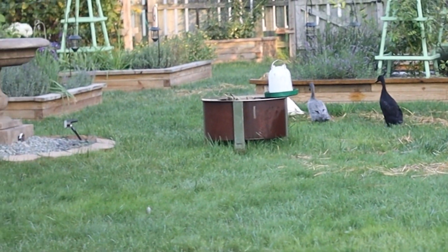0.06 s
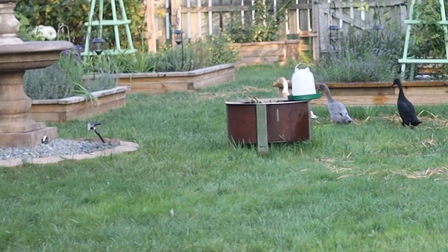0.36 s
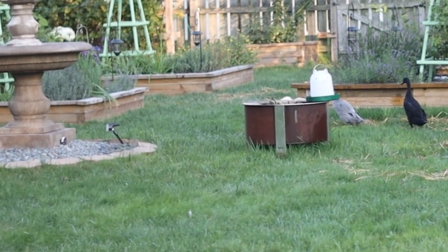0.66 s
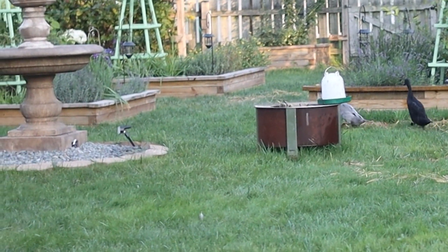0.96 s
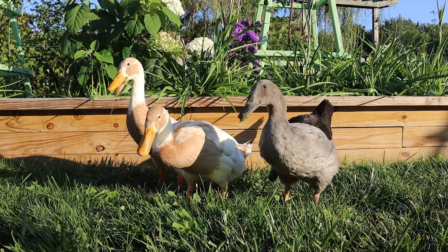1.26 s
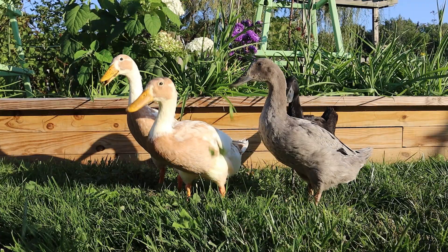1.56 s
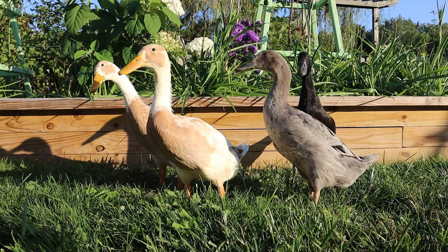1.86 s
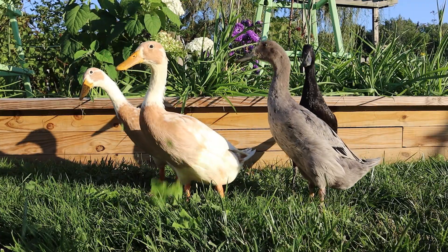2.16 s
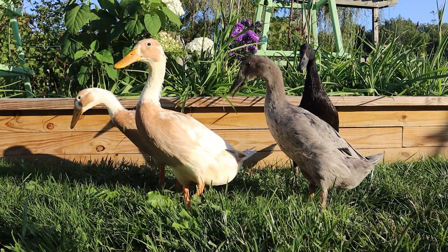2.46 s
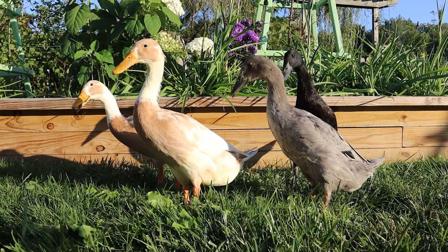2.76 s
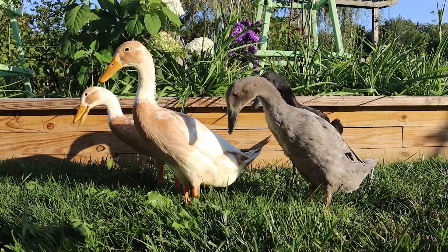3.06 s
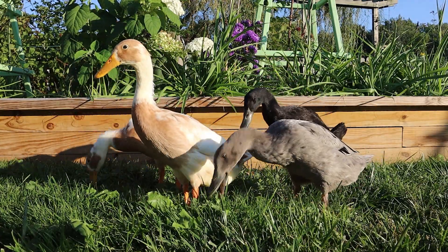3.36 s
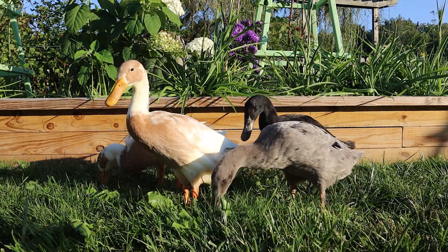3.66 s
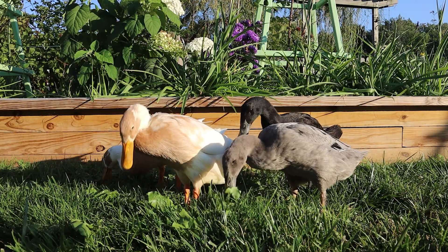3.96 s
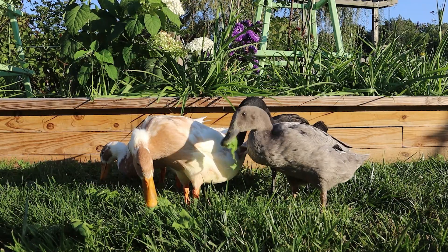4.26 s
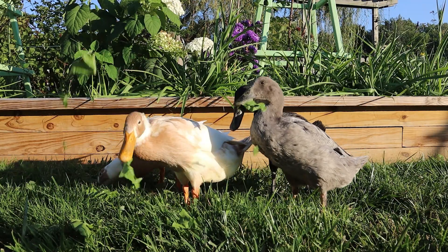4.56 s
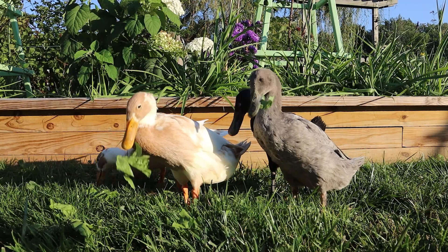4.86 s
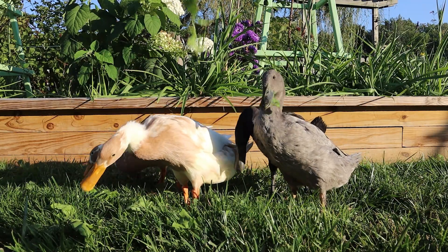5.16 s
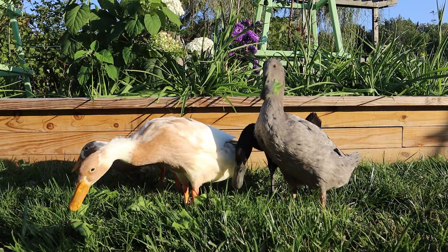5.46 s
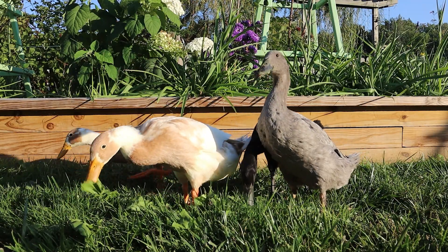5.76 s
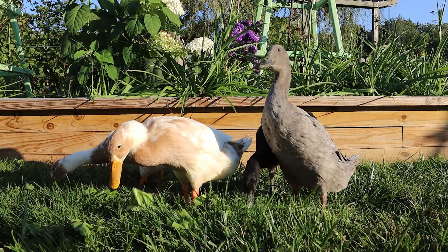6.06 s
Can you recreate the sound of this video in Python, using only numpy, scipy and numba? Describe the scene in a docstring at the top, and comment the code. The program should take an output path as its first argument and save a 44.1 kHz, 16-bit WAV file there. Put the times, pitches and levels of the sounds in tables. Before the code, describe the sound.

After a brief distant traffic rumble, nearby ducks tear grass, clap their bills and mutter with soft quacks and small falling squeaks.

```python
"""A garden lawn. Town noise and a faint insect fill the first 1.2 s; then the wash drops and ducks forage close.
Syrinx pulses ring chest, throat and bill: swelling grunts, some with a whistle, one full croak,
and short mutters that break into falling squeaks. Bills clap shut and tear grass until it snaps.
A distant motor gathers speed; boards and fence return a short echo."""
import sys
import numpy as np
from scipy import signal
from scipy.fft import rfft, irfft
from scipy.io import wavfile
from scipy.ndimage import uniform_filter1d
from numba import njit

SR = 44100
rng = np.random.default_rng(int(sys.argv[2]) if len(sys.argv) > 2 else 0)


def unload_audio(sound):
    """Save the sound as a 16-bit wav file, at the path given as the first command line argument."""
    columns = np.transpose(np.atleast_2d(sound))
    # keep every value between -1 and 1, then stretch to whole-number steps
    steps = np.round(np.clip(columns, -1, 1) * 32767)
    wavfile.write(sys.argv[1], SR, steps.astype(np.int16))


N = 269892
T = np.arange(N) / SR

# Town noise spectra, far and near. Each row: frequency in Hz, level in dB.
FAR_TOWN_SPECTRUM = [(15, -40.5), (25, -11.5), (50, -8), (98, -0.5), (154, -9.5), (191, -6.5), (326, -19.5),
                     (415, -23), (543, -25.5), (709, -18.5), (1030, -15.5), (2240, -27), (3630, -48),
                     (8780, -65), (11800, -75), (15000, -103)]
NEAR_TOWN_SPECTRUM = [(15, -66), (25, -32.5), (60, -13.5), (130, -8), (200, -17.5), (300, -19.5),
                      (450, -28.5), (1200, -26), (2000, -31.5), (3000, -44), (5000, -52), (7000, -55.5),
                      (10000, -65), (15000, -76.5)]
# Width of diffuse sound. Each row: frequency in Hz, side minus mid in dB.
DIFFUSE_WIDTH = [(60, -32.5), (110, -29), (200, -17), (380, -11.5), (700, -9), (1290, -5.5), (2380, -1),
                 (4400, 3), (8120, 5.5), (15000, 1.5)]
# Engine run-up. Each row: time in seconds, cycle rate in Hz, level in dB.
MOTOR_RUN_UP = [(1.199, 13, -71.5), (2.999, 15.3, -66), (3.999, 18, -49.5), (4.999, 20.2, -51),
                (5.6, 20.5, -43), (6.12, 25.3, -39.5)]
# Engine orders. Each row: multiple of the cycle rate, relative level in dB.
MOTOR_HARMONICS = [(4, -21), (6, -8.5), (7, -1), (8, 1), (10, -1), (11, -5.5), (12, -7), (16, -16.5)]
# Stereo image, for voices and for grazing. Each row: frequency in Hz, left phase lead in radians, left minus
# right in dB.
VOICE_STEREO = [(100, 0.1, -2), (400, 0.17, -0.1), (1200, 0.49, -1.5), (2200, 0.64, -2), (4200, 1, -1.5),
                (5950, -2, -4), (8000, -0.5, -5), (15000, -2.5, -1)]
GRAZING_STEREO = [(100, 0.3, 0), (400, 0.27, 0.2), (1216, 0.2, 0.3), (2190, 0.87, -0.4),
                  (4600, 1.17, -0.49), (6140, 0.9, -0.39), (8030, 2.39, -1.1), (15000, 2.35, 0.3)]

# Grass rustling, tearing and snapping. Each row: frequency in Hz, gain in dB.
RUSTLE_SPECTRUM = [(600, -27), (2000, -3), (3600, 6.5), (5000, -3.5), (7000, -20.5), (14000, -33)]
TEAR_SPECTRUM = [(130, -8.5), (260, -5), (380, -1), (600, 13), (950, -15), (1500, 1), (3000, -1.5),
                 (5200, -4), (8000, -7.5), (11000, -18), (16000, -36)]
SNAP_SPECTRUM = [(150, -12), (650, -0.5), (1000, -23.5), (2000, 0.5), (3200, 1), (4100, -3.5), (4900, 5.5),
                 (6200, -15), (8000, -6.5), (10500, -25.5), (16000, -29.5)]
# Nibbles. Each row: start in seconds, length in seconds, level in dB.
GRASS_NIBBLES = [(0.878, 0.066, -50), (2.667, 0.018, -52), (3.037, 0.018, -55.5), (3.423, .026, -33),
                 (3.746, .012, -54), (3.802, 0.014, -49), (4.644, .014, -49.5), (4.738, .014, -56),
                 (5.189, 0.011, -45)]
# Grass pulls. Each row: snap time and pull length in seconds, snap and tear levels in dB,
# hollow bill ring in dB, gain at 12 kHz in dB.
GRASS_PULLS = [(1.232, .035, -22.5, -39, -3, -2), (1.8855, .075, -24, -39.5, -15, -5),
               (2.7069, .055, -29, -47, 4, 1), (3.487, 0.14, -18.5, -36.5, -3.5, -1),
               (4.181, 0.043, -22.5, -41.5, -18, -4), (5.003, .095, -20, -36.5, -1.5, -6),
               (5.75, 0.098, -17.5, -34, -3.5, -2), (6.087, 0.00081, -37.5, -47.5, -11, -13)]
# Hollow bill. Each row: mode frequency in Hz, width in Hz, gain in dB.
BILL_MODES = [(309, 23, -8.5), (537, 45, -11.5), (757, 70, -8), (940, 100, -8), (1106, 62, -8.5),
              (1338, 52, 3.5), (1655, 63, -2.5), (1865, 46, -8.5), (2380, 99, -9.5), (2720, 130, -15),
              (3100, 140, -23)]
# Claps. Each row: start in seconds, level in dB, factor on the mode frequencies,
# choke time in seconds, left minus right in dB.
BILL_CLAPS = [(1.4439, -14, 1.018, 0.018, 4), (1.9313, -14, .99, 0.01, 5.5), (3.1484, -20, 1.1, .007, 3),
              (4.5197, -26, 1.11, 0.0038, -2), (4.5956, -34, 1.1, 0.0052, -1),
              (4.898, -28, 1.03, 0.005, -1.5), (5.0869, -23.5, 1, 0.0038, -4)]

# Chest response. Each row: multiple of the chest resonance, gain in dB.
CHEST_RESPONSE = [(.21, -29), (.42, -7), (.67, 0), (1, 9.5), (1.3, -2), (1.6, -0.5), (2.7, -65)]
# Throat and upper bill resonances. Each row: frequency in Hz, width in Hz, gain in dB.
THROAT_MODES = [(582, 70, 6.5), (816, 110, -4)]
RASP_MODES = [(2400, 300, 2), (3610, 290, 2), (4430, 350, 0.5), (5730, 470, -0.5)]
# Bill rasp, windpipe and wide-open throat. Each row: frequency in Hz, gain in dB.
RASP_SPECTRUM = [(1500, -18), (2500, -1), (3600, 0), (4700, 0), (5400, -5), (6300, -10), (7200, -17),
                 (15000, -32)]
WINDPIPE_SPECTRUM = [(100, 0), (390, 0), (490, 0.5), (590, -1), (700, -2), (950, 3), (1280, 2.5),
                     (1500, -1.5), (2200, 1.5), (3100, -2), (3600, -1.5), (4250, -4), (4800, -9),
                     (5600, -5), (7000, -9.5), (15000, -23)]
CROAK_SPECTRUM = [(100, -24.5), (250, 2), (380, -3.5), (520, -6.5), (740, -2.5), (950, -27), (1300, -15),
                  (1850, -16.5), (2300, -23), (2650, -21), (3300, -30.5), (5200, -35), (7000, -48),
                  (15000, -63)]
# Whistles on the build-up of grunts. Each row: top time and fall in seconds, top in Hz, level in dB.
GRUNT_WHISTLES = [(3.754, .028, 1850, -27.5), (3.951, 0.034, 1850, -33), (5.201, 0.025, 1927, -30.5)]
# Mutters. Each row: start, squeak top time and squeak fall in seconds, opening level in dB,
# bill ring over that in dB, squeak level in dB, squeak top in Hz, closing grunt length in seconds.
MUTTER_CALLS = [(2.215, 2.253, 0.021, -42.5, -5, -52.5, 1787, 0.0018),
                (2.527, 2.556, .017, -37, -9.5, -30.5, 1850, .035),
                (3.153, 3.183, 0.017, -26, -1.5, -27.5, 2020, .021),
                (3.638, 3.669, .016, -48.5, 0, -32.5, 1680, .009),
                (3.99, 4.029, .024, -55.5, -14, -50.5, 1860, 0.0032),
                (4.182, 4.213, 0.03, -31.5, -12.5, -44, 1950, 0.00065),
                (4.37, 4.412, 0.015, -40, -11, -47.5, 1880, 0.0012),
                (4.519, 4.553, .018, -32.5, 0.5, -26, 1980, .02),
                (5.019, 5.046, .023, -28, -2.5, -23.5, 1980, .019)]
# Swelling grunts. Each row: crest time, build-up and fade in seconds, crest pitch in Hz,
# crest half-width in seconds, chest, throat, bill and rasp levels in dB ahead of the windpipe,
# open-bill and chest resonances in Hz.
GRUNT_CALLS = [(1.8993, 0.037, .03, 146.2, 0.02, -34.5, -38.5, -33.5, -43, 1300, 315),
               (2.709, .018, .022, 204.8, .02, -32, -29, -33.5, -44, 1320, 362),
               (2.7384, 0.012, 0.019, 167.5, 0.019, -34.5, -36, -30, -45, 1530, 331),
               (3.0, .045, .03, 171, 0.018, -30.5, -37, -28, -42, 1437, 339),
               (3.294, 0.058, 0.04, 184.8, 0.015, -31, -38.5, -28, -42.5, 1530, 317),
               (3.483, 0.043, 0.019, 206.2, .0082, -28.5, -37, -24, -40, 1690, 336),
               (3.7826, .05, 0.034, 201.3, 0.011, -27.5, -32, -25.5, -37.5, 1750, 339),
               (3.9786, 0.052, 0.018, 202.7, 0.013, -28, -29.5, -24, -37, 1794, 328),
               (4.8705, .046, .03, 192.4, 0.011, -26.5, -31.5, -27.5, -36, 1574, 315),
               (5.2313, 0.052, 0.028, 203.9, 0.013, -26, -27.5, -27, -32, 1785, 313),
               (5.481, 0.0067, 0.025, 190, 0.01, -30, -29.5, -57, -52, 1150, 381),
               (5.531, 0.028, 0.036, 208.4, 0.021, -24.5, -23, -26, -25.5, 1690, 339)]

NEAR_FROM_S = 1.2
CLOSING_HZ = 194.2  # pulse rate at the end of a squeak and in the grunt after it


def undb(db):
    """Decibels to gain."""
    return 10 ** (np.asarray(db) / 20)


def level(x, db, seconds):
    """Scale x so that its energy, spread over the given time, has this rms level."""
    return x * undb(db) / np.sqrt(np.sum(x ** 2) / (seconds * SR) + 1e-18)


def on_bins(points, size):
    """Interpolate (Hz, value) points onto FFT bins."""
    hz, value = np.transpose(points)
    return np.interp(np.log(np.arange(size // 2 + 1) * SR / size + 1), np.log(hz + 1), value)


def colour(x, points, size=4096):
    """Minimum-phase filter with the given (Hz, dB) response."""
    cepstrum = irfft(np.log(undb(on_bins(points, size))))
    cepstrum[1:size // 2] *= 2
    cepstrum[size // 2 + 1:] = 0
    return signal.fftconvolve(x, irfft(np.exp(rfft(cepstrum))))[:len(x)]


def ring(x, hz, width_hz):
    """Fixed resonance, unity gain at centre."""
    return signal.lfilter(*signal.iirpeak(hz, hz / width_hz, fs=SR), x)


@njit
def sweep(x, hz, width_hz):
    """Moving resonance, unity gain at centre."""
    y, band, low = np.empty(len(x)), 0., 0.
    for i in range(len(x)):
        g, damping = np.tan(np.pi * hz[i] / SR), width_hz / hz[i]
        v = (band + g * (x[i] + 1e-18 - low)) / (1 + g * (g + damping))
        band, low, y[i] = 2 * v - band, low + 2 * g * v, damping * v
    return y


def walk(rate_hz):
    """Smooth random drift, spread near 1."""
    hold = int(SR / rate_hz)
    steps = np.repeat(rng.standard_normal(N // hold + 1), hold)
    return 1.3 * uniform_filter1d(uniform_filter1d(steps, hold), hold)[:N]


def window(start_s, size=8192):
    """Sample times of one short event, in seconds."""
    return (int(start_s * SR) + np.arange(size)) / SR


def add(out, x, start_s, pan_db=0):
    """Mix a short sound into both channels."""
    i = int(start_s * SR)
    out[:, i:i + len(x)] += undb(np.array([[pan_db], [-pan_db]]) / 2) * x[:N - i]


def stereo_image(x, table):
    """Near sound is given frequency-dependent phase and level differences between left and right."""
    hz, phase, pan_db = np.transpose(table)
    lead_rad, louder_db = (on_bins(np.transpose([hz, column]), N) for column in (phase, pan_db))
    half = np.array([[1], [-1]]) / 2
    return irfft(rfft(x) * np.exp(1j * half * lead_rad) * undb(half * louder_db), N)


def diffuse(spectrum):
    """Stereo noise from all round."""
    side_gain = undb(on_bins(DIFFUSE_WIDTH, N))
    mid, side = (rfft(rng.standard_normal(N)) * undb(on_bins(spectrum, N)) for _ in range(2))
    return irfft(mid + np.array([[1], [-1]]) * side * side_gain, N)


def town(far_db=-28, near_db=-52):
    """Town rumble and hiss: loud at first, then at 1.2 s the scene changes to a faint wash."""
    far, near = diffuse(FAR_TOWN_SPECTRUM), diffuse(NEAR_TOWN_SPECTRUM)
    far *= undb(far_db + .5 * walk(2.87)) / np.std(far.mean(0))
    rise_db = np.interp(T, [1.5, 3, 6], [-1.5, 1, 3])
    near *= undb(near_db + rise_db + 2 * walk(3.017)) / np.std(near.mean(0))
    far_gate = np.interp(T, [NEAR_FROM_S - .004, NEAR_FROM_S + .0047], [1, 0])
    return far * far_gate + near * (T > NEAR_FROM_S)


def insect(hz=8750, width_hz=220, db=-77, length_s=.055, period_s=.247, until_s=.9):
    """Far insect: thin, high chirps at an even pace."""
    gate = (T % period_s < length_s) & (T < until_s)
    song = ring(ring(rng.standard_normal(N), hz, width_hz), hz, width_hz)
    return level(song, db, N / SR) * uniform_filter1d(gate.astype(float), size=400)


def drone(base_db=-61, start_hz=350, end_hz=300):
    """A faint far hum sinks in pitch, swells and dies down."""
    phase = 2 * np.pi * np.cumsum(np.interp(T, [NEAR_FROM_S, 3], [start_hz, end_hz])) / SR
    hum = walk(100) * np.sin(phase) + walk(100) * np.cos(phase)
    return undb(base_db) * hum * np.interp(T, [NEAR_FROM_S, 1.5, 2.8, 4], [.26, .16, 2.66, .1])


def motor(flutter_db=3):
    """Far engine: low orders climb together, each fading in and out."""
    times_s, hz, db = np.transpose(MOTOR_RUN_UP)
    phase = 2 * np.pi * np.cumsum(np.interp(T, times_s, hz) * (1 + .021 * walk(40))) / SR
    hum = sum(undb(order_db + flutter_db * walk(9.3)) * np.sin(order * phase + 2 * np.pi * rng.random())
              for order, order_db in MOTOR_HARMONICS)
    return level(hum, 0, N / SR) * undb(np.interp(T, times_s, db)) * (T > NEAR_FROM_S)


def garden_echo(x, tail_db=-23, t60_s=.15, size=16384):
    """Boards and fence return a short, dull scatter."""
    t = T[:size]
    scatter = diffuse([(100, 0), (400, 5), (1400, -1), (4000, -10.5), (15000, -39)])[:, :size]
    tail = scatter * undb(-60 * t / t60_s) * (t > .003)
    tail *= undb(tail_db) / np.sqrt(np.sum(tail ** 2) / 2)
    return signal.fftconvolve(x.mean(0)[None] / 2, tail, axes=1)[:, :N]


def stirring(db=-70, patchy_db=4):
    """Feet keep the grass faintly stirring."""
    blades = colour(rng.standard_normal(N), RUSTLE_SPECTRUM) * undb(patchy_db * walk(56))
    return level(blades, db, N / SR) * np.interp(T, [NEAR_FROM_S, 2.5, 4], [.12, .16, 1])


def crackle(per_s=70, db=-77, spread_db=3, crumble_s=.00088):
    """Single blades tick underfoot, louder as grazing starts."""
    hits = rng.random(N) < per_s / SR
    strength = undb(spread_db * np.clip(rng.standard_normal(N), -2, 2))
    ticks = hits * strength * np.interp(T, [NEAR_FROM_S, 4], [0, 1])
    crumble = signal.lfilter([1], [1, -np.exp(-1 / (crumble_s * SR))], ticks) * rng.standard_normal(N)
    return level(colour(crumble, [(800, -13), (3500, .5), (8000, -9), (14000, -24)]), db, N / SR)


def nibble(length_s, db):
    """A bill brushes a few blades: a soft rustle swells and fades."""
    t = window(0)
    brush = rng.standard_normal(len(t)) * np.sin(np.pi * np.minimum(t / length_s, 1)) ** 2
    return level(colour(brush, RUSTLE_SPECTRUM), db, length_s / 2)


def tear(grip_s, snap_s, db, hollow_db, release_s=.0099):
    """Fibres part in a dense rip that grows with the pull, slackens and stops as the blade gives."""
    t = window(grip_s)
    strain = np.interp((t - grip_s) / (snap_s - grip_s), [0, .35, .72, 1], [0, .2, .83, .67])
    strain *= np.exp(-np.maximum(t - snap_s, 0) / release_s)
    fibres = rng.standard_normal(len(t)) * (rng.random(len(t)) < .18)
    fibres *= undb(4 * np.minimum(rng.exponential(size=len(t)), 3) + 3.6 * walk(400)[:len(t)])
    rip = colour(fibres * strain ** .77, TEAR_SPECTRUM)
    return level(colour(rip, [(380, 0), (600, hollow_db), (950, 0)]), db, snap_s - grip_s)


def snap(db, crumble_s=.0021):
    """The last fibres break at once: a sharp click, a brief crumble."""
    t = window(0)
    burst = .11 * rng.standard_normal(len(t)) * np.exp(-t / crumble_s)
    burst[0] += 1
    return level(colour(burst, SNAP_SPECTRUM), db, .0061)


def clap(db, mode_scale, choke_s, contact_s=.0013, tick_db=-22, choked_above_hz=600):
    """The bill presses shut, snaps home and its hollow rings."""
    t = window(0)
    blow = .02 * rng.standard_normal(len(t)) * np.minimum(t / contact_s, 1) * np.exp(-t / .004)
    blow[int(contact_s * SR / 2)] += 1
    choke = np.exp(-(t / choke_s) ** 3 / 2)  # the shut halves damp all but the lowest modes
    hollow = np.zeros(len(t))
    for k, (hz, width_hz, mode_db) in enumerate(BILL_MODES):
        # alternating signs make the knock swell briefly
        mode = (-1) ** k * undb(mode_db) * ring(blow, hz * mode_scale, width_hz)
        hollow += mode * (choke if hz > choked_above_hz else 1)
    tick = colour(rng.standard_normal(len(t)) * np.exp(-abs(t - contact_s) / .00061), SNAP_SPECTRUM)
    knock = level(hollow, db, .01) + level(tick, db + tick_db, .01)
    treble_db = np.interp(db, [-18, -16], [-30, 0])  # only hard claps are bright
    return colour(knock, [(2000, 0), (3000, treble_db / 2), (9000, treble_db)])


def grass_pull(snap_s, pull_s, snap_db, tear_db, hollow_db, crisp_db):
    """A bill tears grass until it snaps. Returns (sound, start) pairs."""
    grip_s = snap_s - pull_s
    crispness = [(6000, 0), (12000, crisp_db)]
    return [(colour(tear(grip_s, snap_s, tear_db, hollow_db), crispness), grip_s),
            (colour(snap(snap_db), crispness), snap_s)]


def squeak(top_s, fall_s, top_hz, db, rise_s=.019, floor_ratio=.44, onset_db=-42, breath_db=-16):
    """The syrinx slips into a breathy whistle that arches, dives and roughens. Returns sound, start."""
    t = window(0) - rise_s
    peak_s, end_s = .7 * fall_s, 1.47 * fall_s
    fall = np.clip(t / end_s, 0, 1)
    arch = np.exp(-(t / np.where(t < 0, .027, fall_s)) ** 2)
    hz = top_hz * (floor_ratio + (1 - floor_ratio) * arch)
    waver, flutter = walk(1100)[:len(t)], walk(800)[:len(t)]
    phase = 2 * np.pi * np.cumsum(hz * (1 + (.035 + .055 * fall) * waver)) / SR
    onset = min(undb(onset_db - db), 1)
    swell = np.interp(t, [-rise_s, 0, peak_s / 3, peak_s, end_s, end_s + .004],
                      [onset / 2, onset, max(onset, .25), 1, .45, 0])
    swell *= 1 + .4 * fall * flutter
    # returning pulses chop the end
    growl = 1 + .56 * fall ** 2 * np.cos(2 * np.pi * (CLOSING_HZ * t + rng.random()))
    breath = colour(rng.standard_normal(len(t)), [(500, -9), (1100, 6.5), (3200, -8.5), (8000, -44)])
    overtone_db = np.interp(db, [-45, -30], [-11, -22])  # louder is rounder
    tone = level(breath, breath_db, len(t) / SR) + np.sin(phase) + undb(overtone_db) * np.sin(2 * phase)
    return np.sqrt(2) * undb(db) * swell * growl * tone, top_s - rise_s


def croak(db=-16.5, hold_s=.059, release_s=.0091, edge_hz=140, top_hz=271, edge_db=-4):
    """Even syrinx pulses arch in pitch, strength and brightness through a wide-open throat."""
    t = window(0)
    arch = np.sin(np.pi * np.minimum(t / hold_s, 1))
    hz = (edge_hz + (top_hz - edge_hz) * arch) * (1 + .017 * walk(250)[:len(t)])
    pulses = np.diff(np.floor(np.cumsum(hz) / SR), prepend=-1)
    breath = .038 * colour(rng.standard_normal(len(t)), [(500, -2.5), (1500, 3), (3500, -1)])
    effort = undb(edge_db * (1 - arch)) * np.exp(-np.maximum(t - hold_s, 0) / release_s)
    bright = -(pulses + breath) * effort
    soft = colour(bright, [(2500, 2.5), (10000, -17.5)])
    source = arch ** 2 * bright + (1 - arch ** 2) * soft
    return level(colour(source, CROAK_SPECTRUM), db, hold_s)


def syrinx(t, knots_s, pitches_hz):
    """Pulses, ragged at the edges and steady at the crest (t = 0), and the air puff after each."""
    jitter = np.interp(t, knots_s, [.15, .02, .12]) * np.repeat(rng.standard_normal(len(t) // 128), 128)
    shimmer_db = np.interp(t, knots_s, [2.6, .7, 2.6]) * rng.standard_normal(len(t))
    cycles = np.cumsum(np.interp(t, knots_s, pitches_hz) * (1 + jitter)) / SR
    cycles -= np.interp(0, t, cycles)
    sounding = t < knots_s[-1]
    pulses = np.diff(np.floor(cycles), prepend=np.floor(cycles[0])) * undb(shimmer_db)
    puffs = np.exp(-(cycles % 1) / .45) * rng.standard_normal(len(t))
    return pulses * sounding, puffs * sounding


def grunt(build_s, fade_s, pitches_hz, crest_width_s, chest_db, throat_db, bill_db, rasp_db,
          bill_hz, chest_hz, chest_fade_s=.027, spread=.22, shut_ratio=.75):
    """Soft syrinx pulses thump the chest; at the crest of the effort they sharpen and ring the bill."""
    t = window(0) - build_s
    knots_s = [-build_s, 0, fade_s]
    pulses, puffs = syrinx(t, knots_s, pitches_hz)
    effort = np.interp(t, knots_s, [.25, 1, .25])
    sharpness = 1 / (1 + np.where(t < 0, (t / (.8 * crest_width_s)) ** 6, (t / crest_width_s) ** 4))

    push = effort ** .62 * np.exp(-np.maximum(t - crest_width_s, 0) / chest_fade_s)
    chest_spectrum = [(ratio * chest_hz, db) for ratio, db in CHEST_RESPONSE]
    chest = colour(-(pulses + .035 * puffs) * push, chest_spectrum)
    breathy = ring((pulses + .07 * puffs) * effort, hz=640, width_hz=550)
    throat = sum((-1) ** k * undb(db) * ring(breathy, hz, width_hz)
                 for k, (hz, width_hz, db) in enumerate(THROAT_MODES))

    # the bill opens toward the crest, lifting its resonances
    centre_hz = bill_hz * (shut_ratio + (1 - shut_ratio) / (1 + (t / crest_width_s / 2) ** 2))
    buzz = (pulses + .03 * puffs) * (sharpness + .23 * effort)
    pair = sweep(buzz, (1 - spread) * centre_hz, 330.) - sweep(buzz, (1 + spread) * centre_hz, 290.)
    bill = sweep(sweep(pair, centre_hz, 670.), centre_hz, 1700.)
    taper = np.clip((fade_s - t) / .015, .25, 1)
    scrape = colour((pulses + .13 * puffs) * (sharpness + .22 * effort) * taper, RASP_SPECTRUM)
    rasp = .42 * scrape + sum(undb(db) * sweep(scrape, hz * (centre_hz / bill_hz) ** .5, float(width_hz))
                              for hz, width_hz, db in RASP_MODES)

    layers = [(chest, chest_db), (throat, throat_db), (bill, bill_db), (rasp, rasp_db)]
    voice = sum(level(x, db, build_s + fade_s) for x, db in layers)
    treble_db = np.interp(build_s, [.012, .022], [-13, 0])  # sudden grunts pass a nearly closed bill
    return colour(colour(voice, WINDPIPE_SPECTRUM), [(3400, 0), (6000, treble_db)])


def short_grunt(rise_s, fade_s, db, ring_db, pitch_hz, end_hz, crest_width_s, bill_hz):
    """The brief grunt on either side of a squeak."""
    return grunt(rise_s, fade_s, [pitch_hz, pitch_hz, end_hz], crest_width_s,
                 chest_db=db, throat_db=db - 3.5, bill_db=db + ring_db, rasp_db=db + ring_db - 10.5,
                 bill_hz=bill_hz, chest_hz=316)


def mutter(start_s, top_s, fall_s, open_db, ring_db, squeak_db, top_hz, close_s):
    """An abrupt grunt slips into a squeak and drops back. Returns (sound, start) pairs."""
    opening = short_grunt(rise_s=.0019, fade_s=.021, db=open_db, ring_db=ring_db,
                          pitch_hz=217.7, end_hz=217.7, crest_width_s=.015, bill_hz=1463)
    whistle, whistle_s = squeak(top_s, fall_s, top_hz, squeak_db)
    closing = short_grunt(rise_s=.31 * close_s, fade_s=.69 * close_s, db=squeak_db - 2.5, ring_db=.5,
                          pitch_hz=CLOSING_HZ, end_hz=156, crest_width_s=.012, bill_hz=1407)
    return [(opening, start_s), (whistle, whistle_s), (closing, top_s + .019)]


def swelling_grunt(crest_s, build_s, fade_s, pitch_hz, *timbre):
    """A low grunt swells, opens into a brief quack and sags. Returns sound, start."""
    pitches_hz = [.86 * pitch_hz, pitch_hz, .4 * pitch_hz]
    return grunt(build_s, fade_s, pitches_hz, *timbre), crest_s - build_s


def scene():
    """Ducks before the microphone pair, garden and town around them."""
    voices = np.zeros((2, N))
    grazing = np.zeros((2, N)) + stirring() + crackle()
    for call in GRUNT_CALLS:
        add(voices, *swelling_grunt(*call))
    for call in MUTTER_CALLS:
        for sound, start_s in mutter(*call):
            add(voices, sound, start_s)
    for call in GRUNT_WHISTLES:
        add(voices, *squeak(*call))
    add(voices, croak(), start_s=3.346)
    for start_s, db, mode_scale, choke_s, pan_db in BILL_CLAPS:
        add(grazing, clap(db, mode_scale, choke_s), start_s, pan_db)
    for start_s, length_s, db in GRASS_NIBBLES:
        add(grazing, nibble(length_s, db), start_s)
    for pull in GRASS_PULLS:
        for sound, start_s in grass_pull(*pull):
            add(grazing, sound, start_s)
    direct = stereo_image(voices, VOICE_STEREO) + stereo_image(grazing, GRAZING_STEREO)
    echo = garden_echo(voices + undb(-4.5) * grazing)  # bills low in the grass send less to the boards
    return direct + echo + motor() + drone() + insect() + town()


def record(dry):
    """Soft peak limit, brief fade-in, steep low-pass."""
    ceiling, fade_in_s, top_hz = .85, .004, 15700
    rounded = ceiling * np.tanh(dry / ceiling) * np.minimum(T / fade_in_s, 1)
    return signal.sosfilt(signal.ellip(8, .2, 80, top_hz, fs=SR, output="sos"), rounded)


dry = scene()
out = record(dry)
unload_audio(out)
```